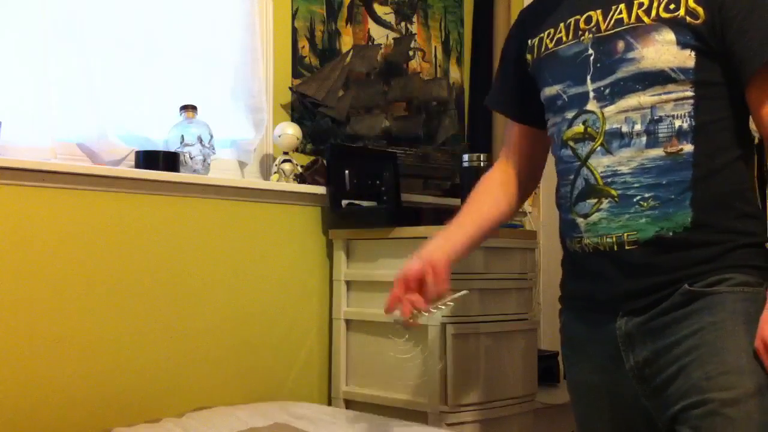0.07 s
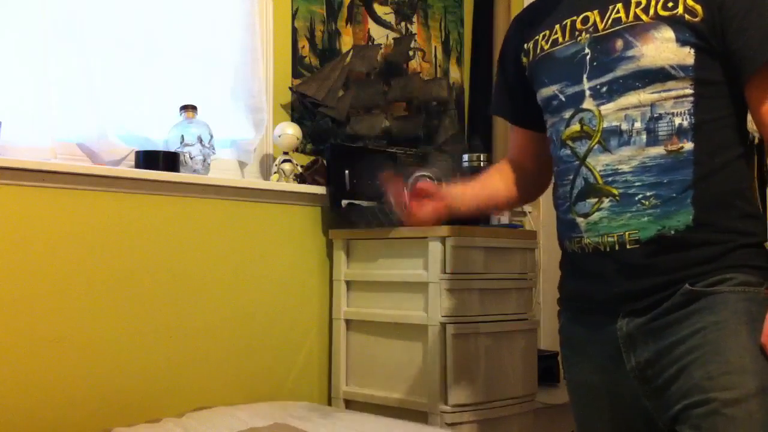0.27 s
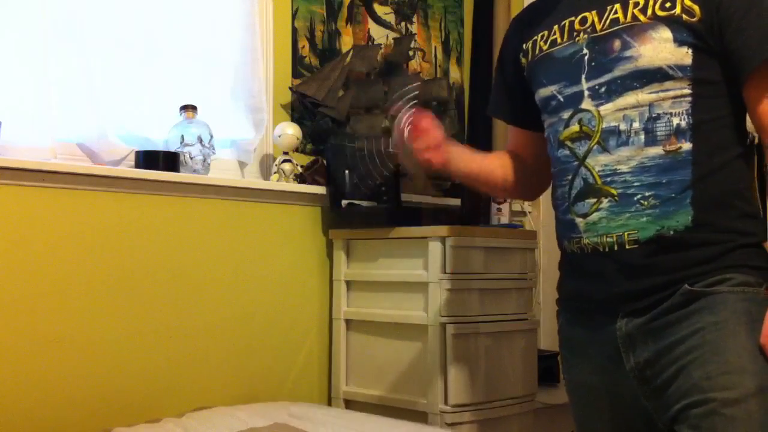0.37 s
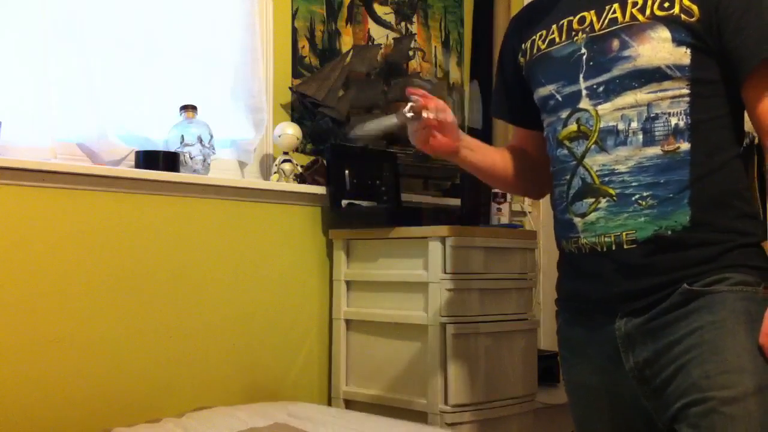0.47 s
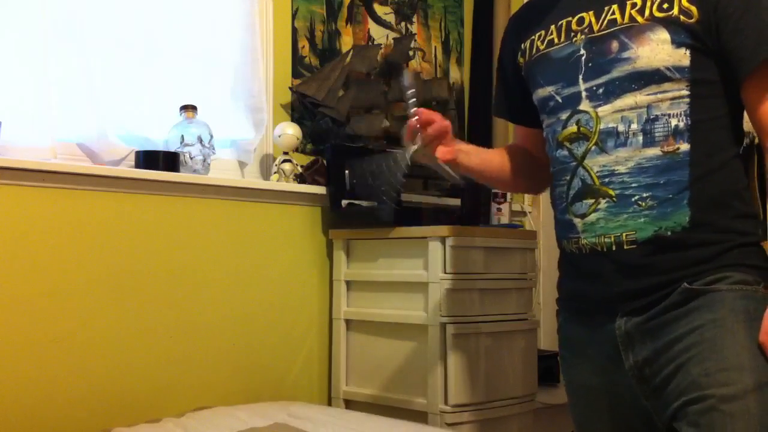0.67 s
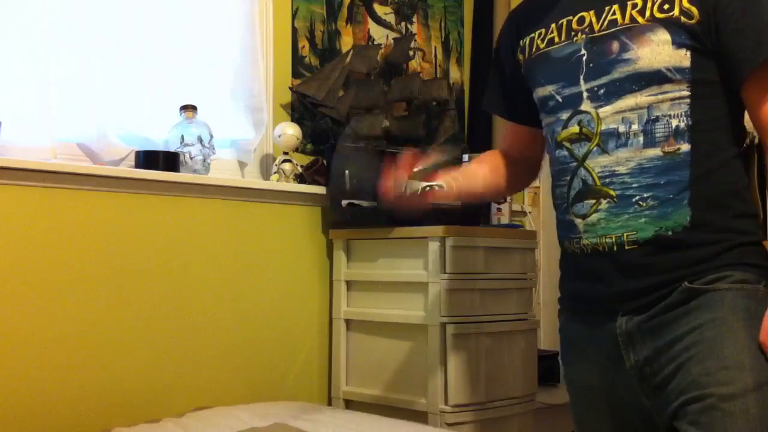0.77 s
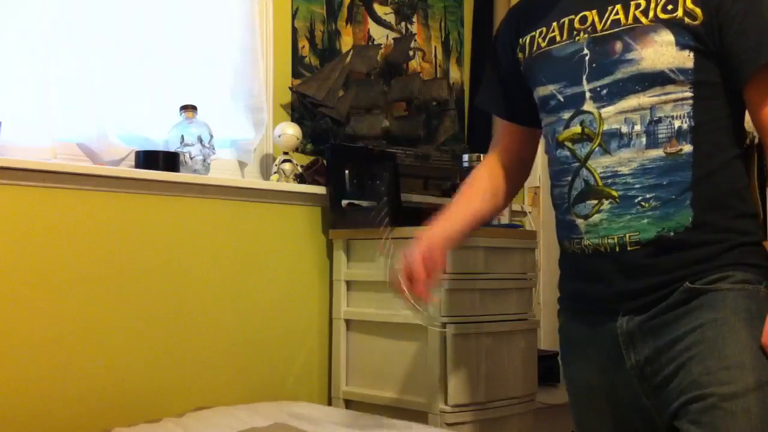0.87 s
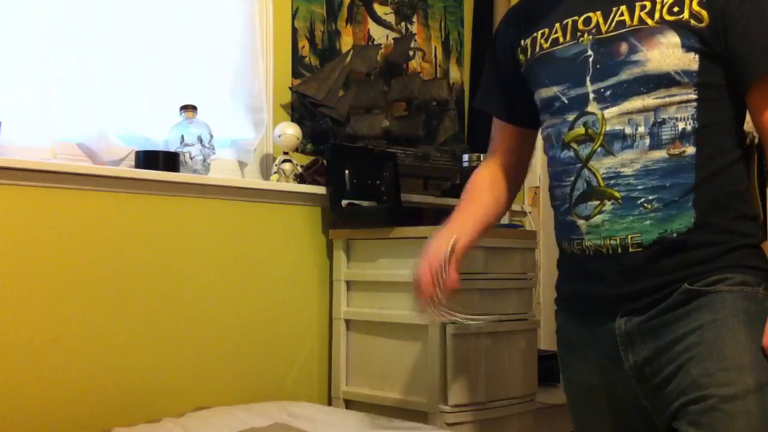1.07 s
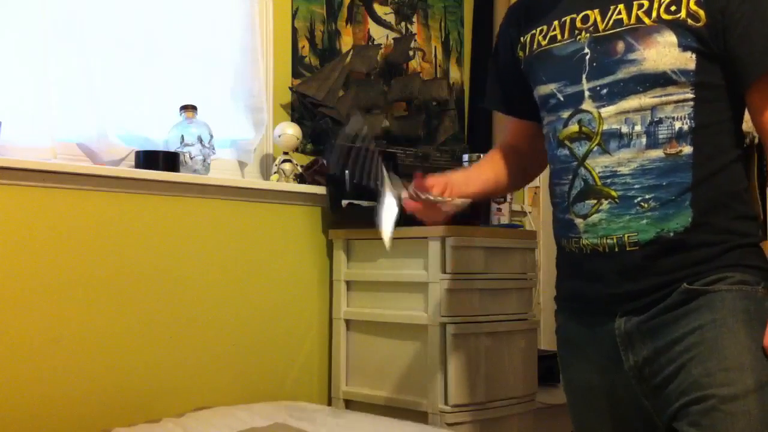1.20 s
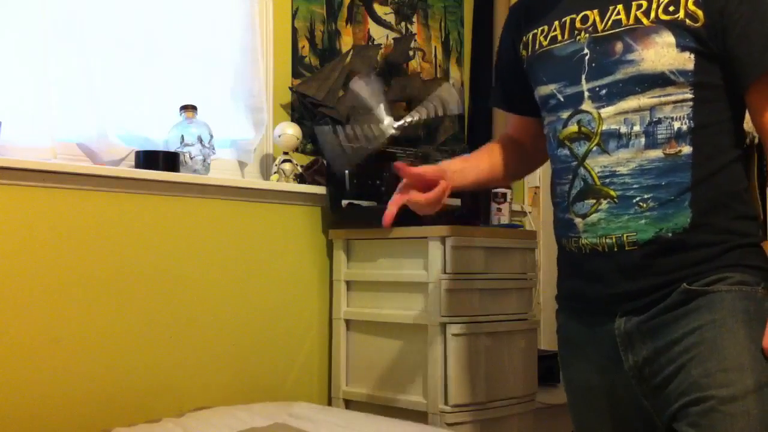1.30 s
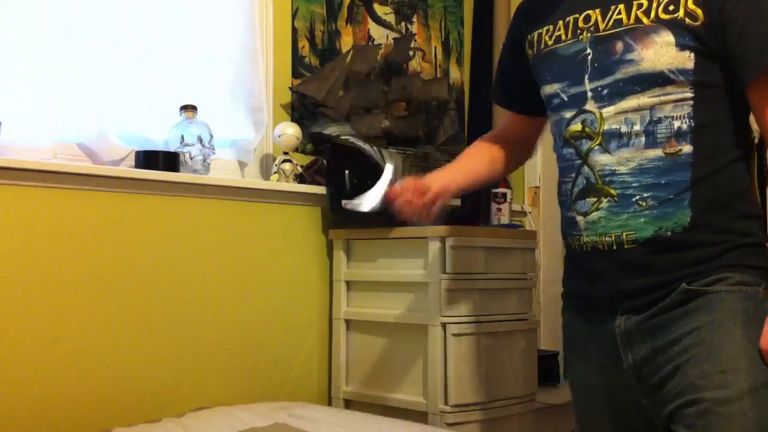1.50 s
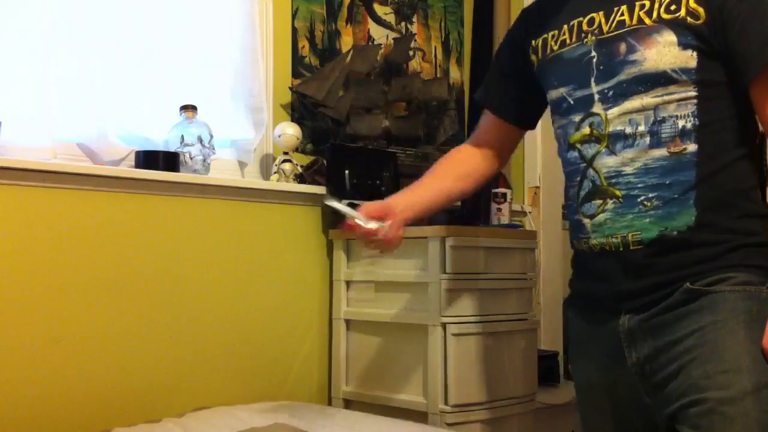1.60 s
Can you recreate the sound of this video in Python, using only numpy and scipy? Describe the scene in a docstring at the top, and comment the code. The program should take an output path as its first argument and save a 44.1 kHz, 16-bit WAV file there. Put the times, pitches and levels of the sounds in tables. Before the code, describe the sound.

Sharp steel clacks come from a butterfly knife swung open and shut nearby. The first is loudest, two lighter ones follow, then a pause and a short rattling clack, with low background hiss in a small room.

```python
"""A small furnished room, with low hum and hiss, where a butterfly knife is flipped.
The steel handles swing round and clack against the blade and each other. Each blow is a short
bright crack plus the ringing modes of blade and handles; the room smears it into a quick tail.
Hand and pivots rustle faintly between blows."""
import sys
import numpy as np
from scipy import signal
from scipy.fft import rfft, irfft
from scipy.io import wavfile

SR = 44100
rng = np.random.default_rng(int(sys.argv[2]) if len(sys.argv) > 2 else 0)


def generate_wav(sig):
    """Save sig (samples, or channels by samples) to the path in sys.argv[1] as 16-bit PCM at SR."""
    pcm = np.round(np.clip(np.atleast_2d(sig).T, -1, 1) * 32767).astype(np.int16)
    wavfile.write(sys.argv[1], SR, pcm)


N = 72765


def amp(db):
    """Decibels to gain."""
    return 10 ** (np.asarray(db) / 20)


def unit(x):
    """Scale to unit energy."""
    return x / np.sqrt(np.sum(x ** 2))


def decay(t, t60_s):
    """Exponential fall, 60 dB in t60_s."""
    return np.exp(-np.log(1000) * t / t60_s)


def bin_octaves(n):
    """Octave position of each frequency bin."""
    return np.log2(np.maximum(np.fft.rfftfreq(n, 1 / SR), 1))


def curve_db(points, n):
    """A (Hz, dB) spectrum read at each bin."""
    hz, db = np.array(points).T
    return np.interp(bin_octaves(n), np.log2(hz), db)


def bell(n, hz, octaves):
    """Gaussian bump of height 1 round a frequency."""
    return np.exp(-.5 * ((bin_octaves(n) - np.log2(hz)) / octaves) ** 2)


def plateau(n, hz, octaves):
    """Flat-topped bump of height 1: several resonances side by side."""
    return np.exp(-((bin_octaves(n) - np.log2(hz)) / octaves) ** 4)


def colour(x, gain_db):
    """Minimum-phase filter with the given gain per bin."""
    n = len(x)
    cepstrum = irfft(np.log(amp(gain_db)), n)
    cepstrum[1:n // 2] *= 2
    cepstrum[n // 2 + 1:] = 0
    return irfft(rfft(x) * np.exp(rfft(cepstrum)), n)


def noise(shape):
    """Noise of rms 1 with the given relative gain per bin."""
    return np.sqrt(N) * unit(irfft(rfft(rng.standard_normal(N)) * shape, N))


# Hiss spectrum. Each row: frequency in Hz, relative density in dB.
HISS_SPECTRUM = [(15, -70), (25, -39), (96, -20.5), (179, -4), (211, -8.5), (284, -9), (542, -10.5),
                 (620, -12), (672, -13.5), (905, -12), (1090, -13), (1280, -14), (1640, -15), (15800, -21)]
# Hum tones. Each row: frequency in Hz, rms level in dB.
HUM_TONES = [(180.5, -82), (300, -90)]

def background(t, hiss_db=-69):
    """Steady hiss and a low hum that wavers slightly in pitch and level."""
    def waver():
        return .2 * noise(bell(N, hz=3, octaves=.96))

    hum = sum(amp(db) * np.sqrt(2) * np.sin(2 * np.pi * hz * t + waver()) * (1 + waver())
              for hz, db in HUM_TONES)
    hiss = amp(hiss_db) * noise(amp(curve_db(HISS_SPECTRUM, N)))
    return hum + hiss


def room_response(t, t60_s=.22, build_s=.00074, direct_db=-6, early_db=-6.5, reflections=12):
    """Paths from one knife position: direct sound, near walls and furniture, diffuse tail."""
    delays_s = rng.uniform(.002, .026, reflections)
    early = np.zeros(len(t))
    early[(delays_s * SR).astype(int)] = rng.standard_normal(reflections) * decay(delays_s, t60_s)
    tail = rng.standard_normal(len(t)) * decay(t, t60_s) * (1 - np.exp(-t / build_s))
    return unit(amp(direct_db) * (t == 0) + amp(early_db) * unit(early) + unit(tail))


def in_room(x, room):
    """A sound after the room, at unit energy."""
    return unit(signal.fftconvolve(x, room)[:len(x)])


def ring(t, modes, room):
    """Decaying steel modes in the room, at unit energy."""
    return unit(sum(amp(db) * in_room(np.cos(2 * np.pi * hz * t) * decay(t, t60_s), room)
                    for hz, db, t60_s in modes))


# Crack spectrum. Each row: frequency in Hz, gain in dB.
CRACK_SPECTRUM = [(60, -36.5), (250, -35), (480, -19), (660, -26.5), (880, -18.5), (1250, -21.5),
                  (1750, -16), (2350, -9), (4200, -10), (5300, -6.5), (5900, -7.5), (7000, -4.5), (8200, 1),
                  (9600, -1.5), (11200, -3.5), (12500, -5.5), (13300, -5.5), (14100, -3), (15700, -15)]
# Blade modes. Each row: frequency in Hz, relative level in dB, T60 in seconds.
BLADE_MODES = [(11460, -8, .06), (11522, 0, .1), (11578, -3, .09), (11712, -11, .05), (14050, -12, .04)]
# Handle modes. Each row: frequency in Hz, relative level in dB, T60 in seconds.
HANDLE_MODES = [(1961, -15, .06), (2345, -9, .06), (2885, -12, .04), (5250, -15, .04), (7365, -9, .04),
                (7990, -6, .06), (8938, 0, .07), (10385, -8, .06)]

def clack(crack_db, knock_db, hollow_db, hollow_hz, treble_db, blade_db, handle_db):
    """One steel-on-steel blow; its colour depends on where the parts meet and how they are held."""
    length_s, level_window_s = .6, .02
    n = int(length_s * SR)
    t = np.arange(n) / SR
    room = room_response(t)
    contact = unit(decay(t, t60_s=.008))
    loose_buzz = amp(-7.5) * unit(decay(t, t60_s=.055))
    burst = rng.standard_normal(n) * (contact + loose_buzz)
    shape_db = (curve_db(CRACK_SPECTRUM, n)
                + knock_db * bell(n, hz=800.5, octaves=1.1)
                + hollow_db * plateau(n, hollow_hz, octaves=.42)
                + treble_db * bell(n, hz=14000, octaves=.21))
    crack = amp(crack_db) * colour(in_room(burst, room), shape_db)
    blade = amp(blade_db) * ring(t, BLADE_MODES, room)
    handles = amp(handle_db) * ring(t, HANDLE_MODES, room)
    return np.sqrt(level_window_s * SR) * (crack + blade + handles)


# Knife blows. Each row: start in seconds, crack gain in dB, low knock boost in dB, hollow handle
# boost in dB, its centre in Hz, treble boost in dB, blade ring in dB, handle ring in dB.
KNIFE_BLOWS = [(-0.045, -33.5, -2, 8, 2550, -11, -37, -49.5), (0.2103, -21, -3, 3.5, 2630, 5, -28.5, -43.5),
               (0.2184, -18, -2.5, -4, 2554, -3.5, -27.5, -32.5),
               (0.2695, -42, 2.5, 11.5, 2600, -13, -40.5, -63),
               (0.471, -29.5, 12.5, 2.5, 2280, 5.5, -45.5, -53), (0.4777, -34, 10, -2.5, 2260, 0, -51, -62),
               (0.4830, -40.5, 14, -6, 2460, 0, -46.5, -55.5), (0.6228, -43, 8, 8.5, 1900, -8, -56.5, -66),
               (0.834, -68, 0.5, -16, 2480, 1, -71.5, -76), (1.1374, -30.5, -1, 2.5, 2950, 1, -43.5, -67),
               (1.1422, -33, 4, 10, 2930, 1, -55, -55), (1.151, -32, 2, 8.5, 2970, -1, -48, -52),
               (1.1606, -33.5, 1, -3, 2955, -5, -47, -58), (1.622, -68, -4, 9, 2500, -3, -71.5, -86)]

def knife(lead_s=.1):
    """The swinging handles strike the blade and each other; the first blow lands just before t = 0."""
    lead = int(lead_s * SR)
    track = np.zeros(lead + N + SR)
    for start_s, *blow in KNIFE_BLOWS:
        sound = clack(*blow)
        onset = lead + int(start_s * SR)
        track[onset:onset + len(sound)] += sound
    return track[lead:lead + N]


# Hand and pivot rustles. Each row: peak time in seconds, Gaussian width in seconds, centre in Hz,
# rms level at the peak in dB.
RUSTLE_SWELLS = [(0.178, 0.0084, 464, -66), (.86, 0.048, 9200, -82), (1.64, 0.026, 396, -81.5)]

def rustles(t):
    """Soft swells of friction as the knife turns in the hand."""
    return sum(amp(db) * np.exp(-.5 * ((t - peak_s) / width_s) ** 2) * noise(bell(N, hz, octaves=.5))
               for peak_s, width_s, hz, db in RUSTLE_SWELLS)


def scene():
    """Background, rustles and knife in one channel."""
    t = np.arange(N) / SR
    return (background(t) + rustles(t) + knife())[None]


def record(dry, cutoff_hz=15750):
    """Steep low-pass on the top treble."""
    return signal.sosfilt(signal.ellip(10, .2, 70, cutoff_hz, fs=SR, output="sos"), dry)


dry = scene()
out = record(dry)
generate_wav(out)
```